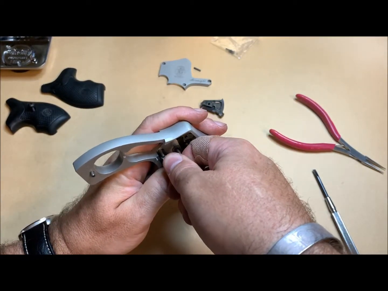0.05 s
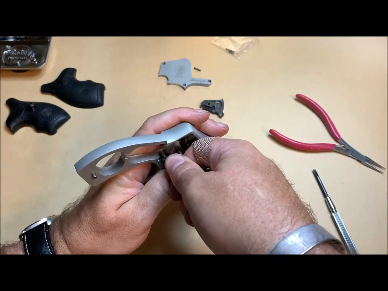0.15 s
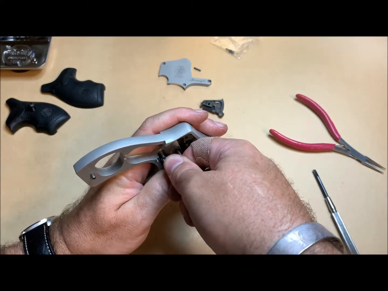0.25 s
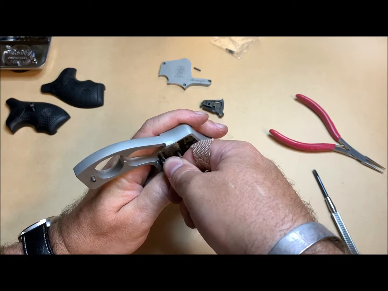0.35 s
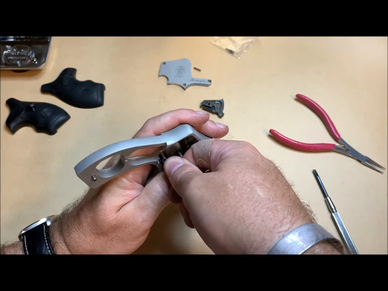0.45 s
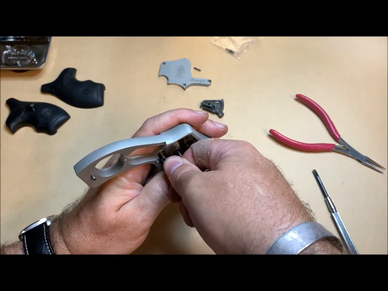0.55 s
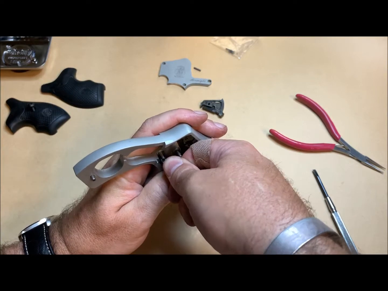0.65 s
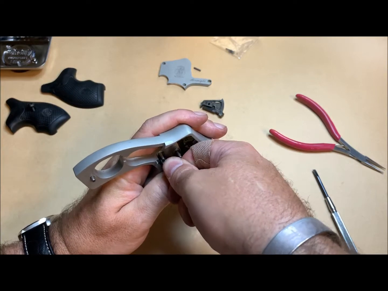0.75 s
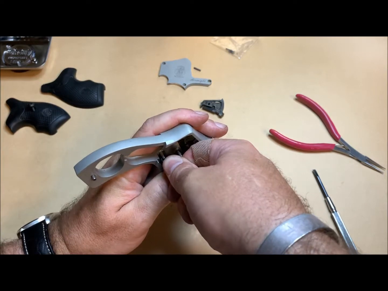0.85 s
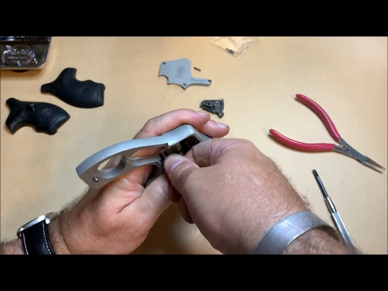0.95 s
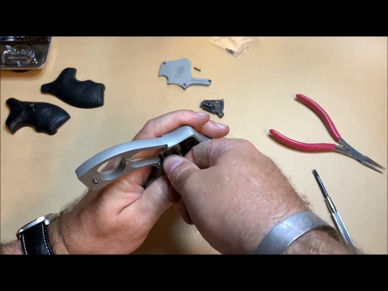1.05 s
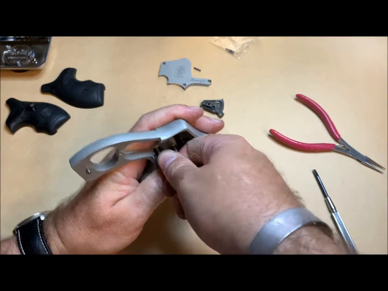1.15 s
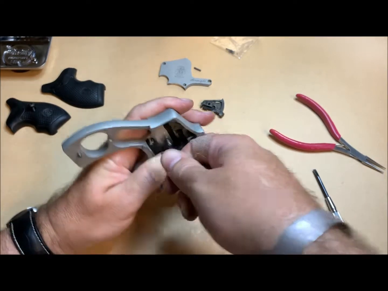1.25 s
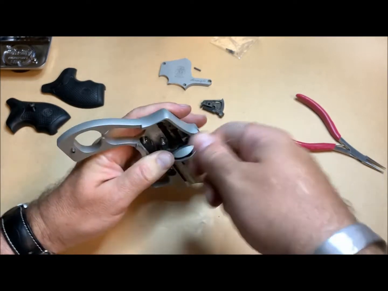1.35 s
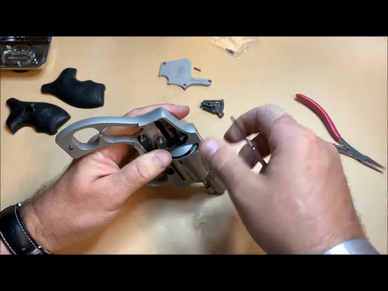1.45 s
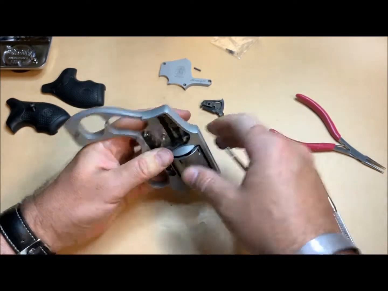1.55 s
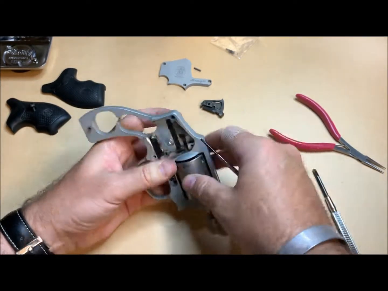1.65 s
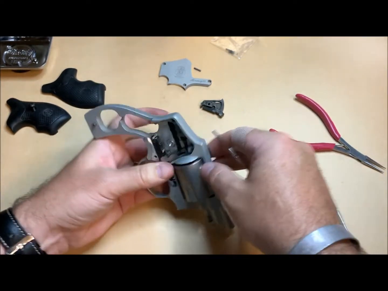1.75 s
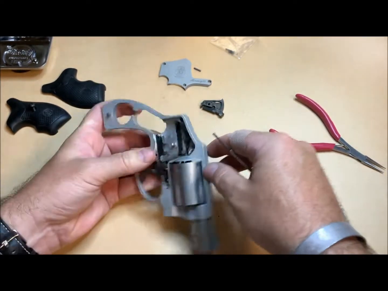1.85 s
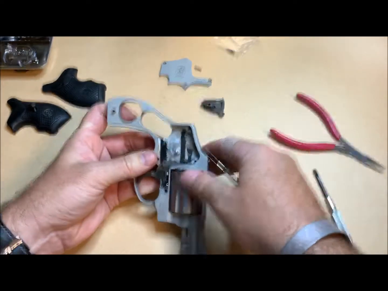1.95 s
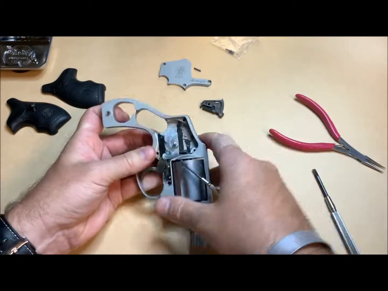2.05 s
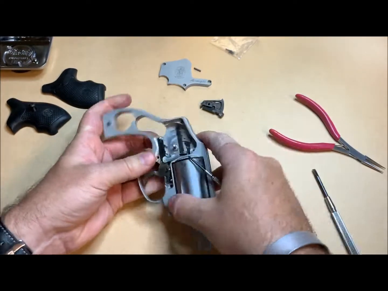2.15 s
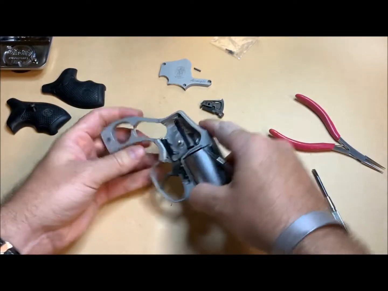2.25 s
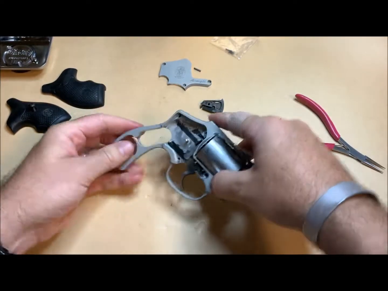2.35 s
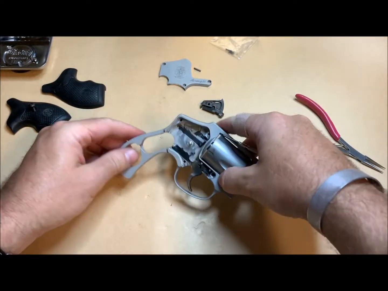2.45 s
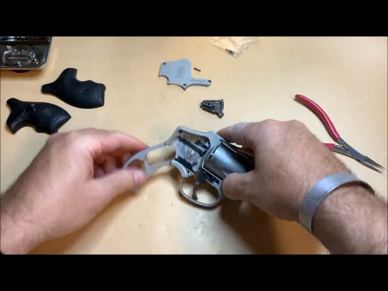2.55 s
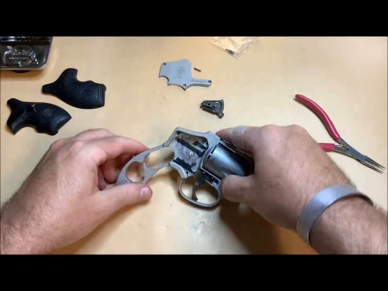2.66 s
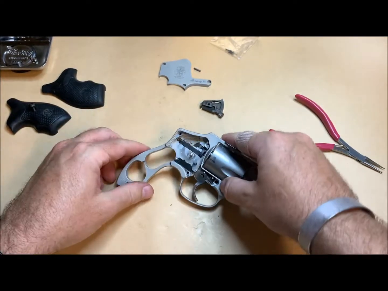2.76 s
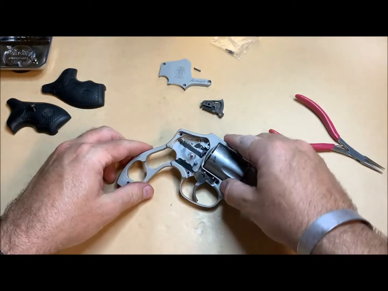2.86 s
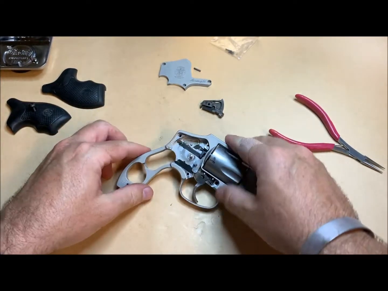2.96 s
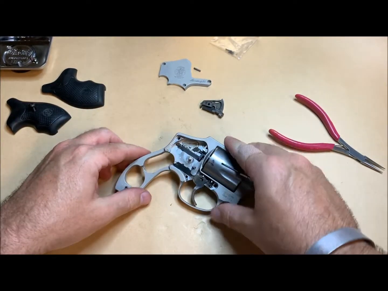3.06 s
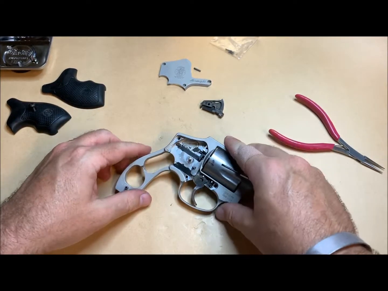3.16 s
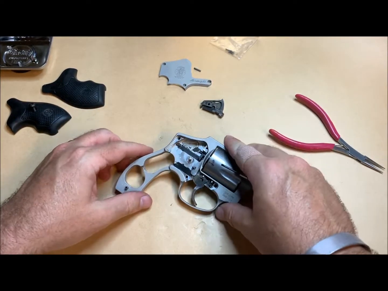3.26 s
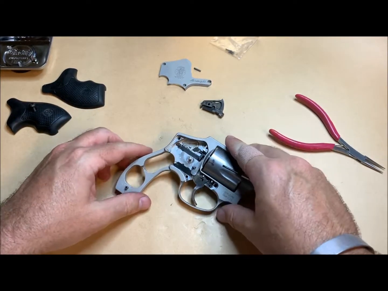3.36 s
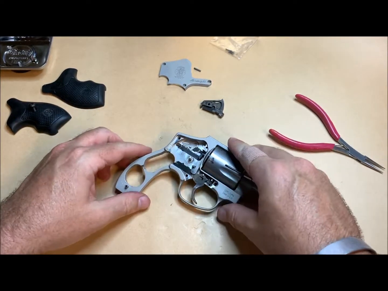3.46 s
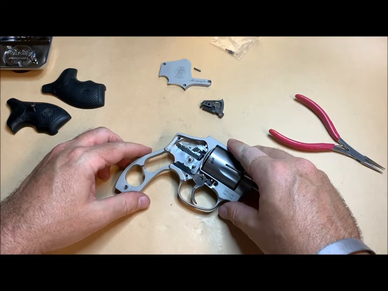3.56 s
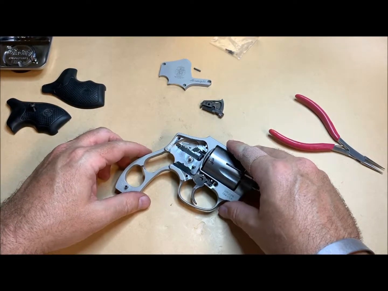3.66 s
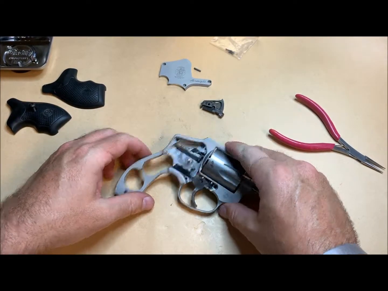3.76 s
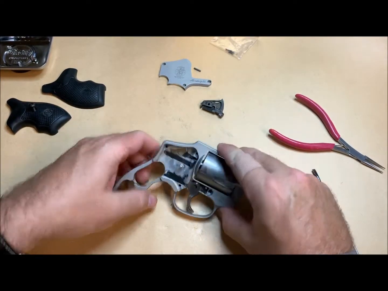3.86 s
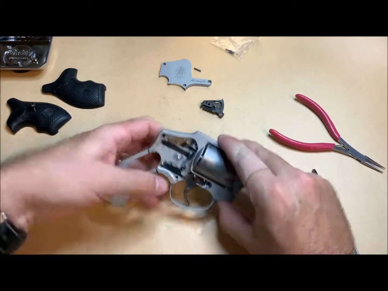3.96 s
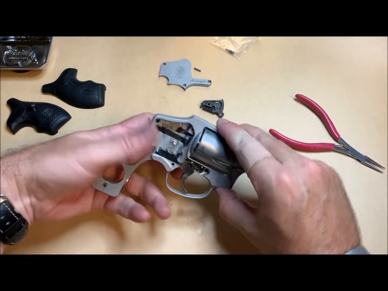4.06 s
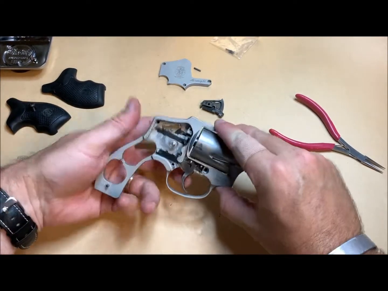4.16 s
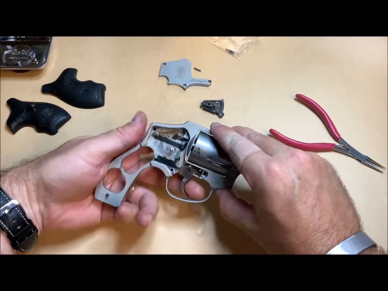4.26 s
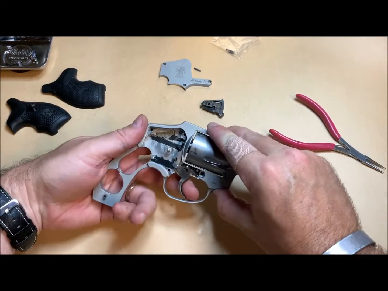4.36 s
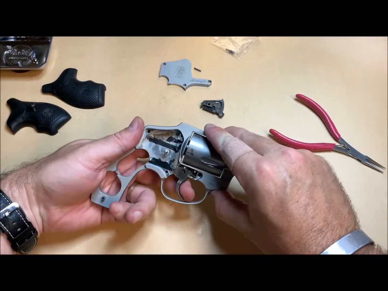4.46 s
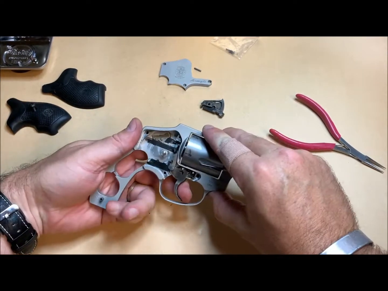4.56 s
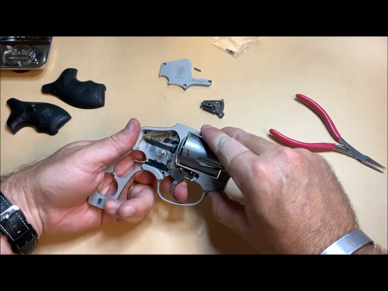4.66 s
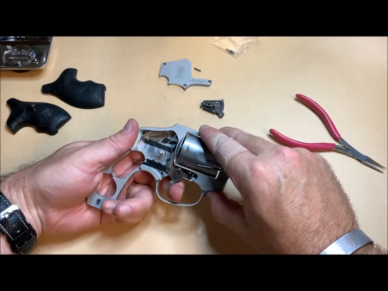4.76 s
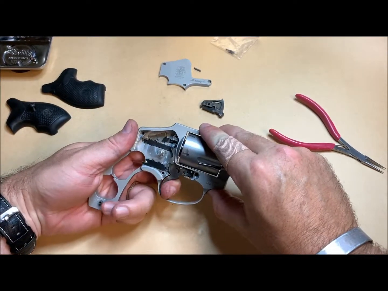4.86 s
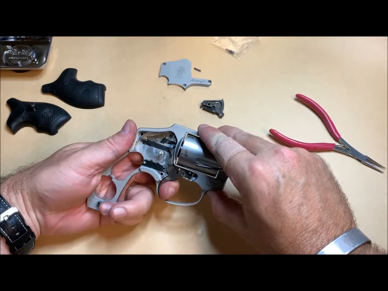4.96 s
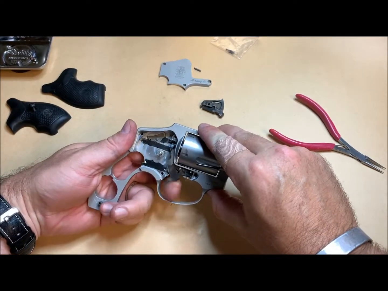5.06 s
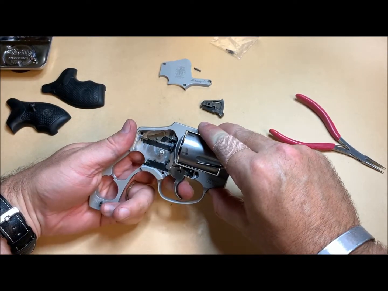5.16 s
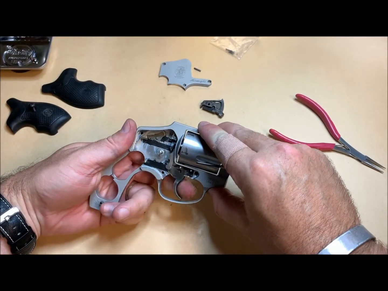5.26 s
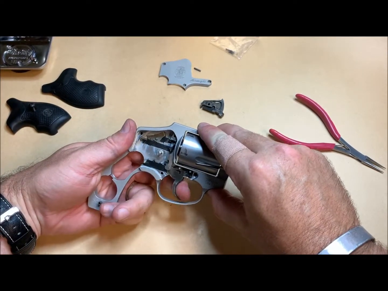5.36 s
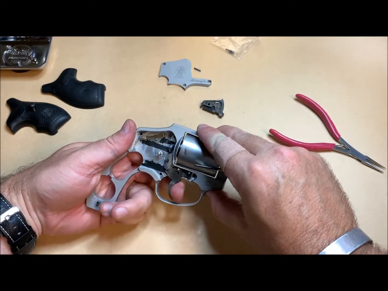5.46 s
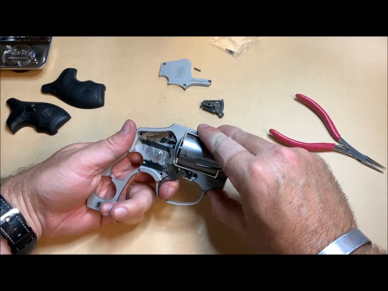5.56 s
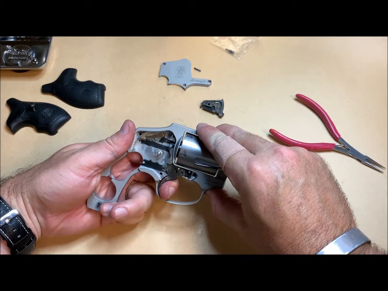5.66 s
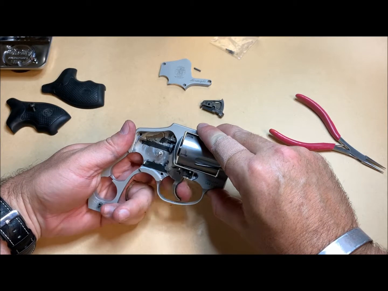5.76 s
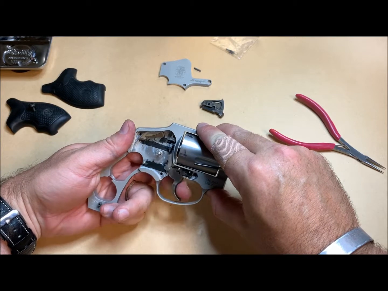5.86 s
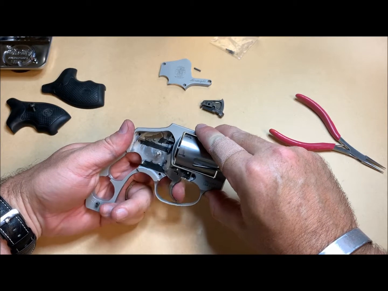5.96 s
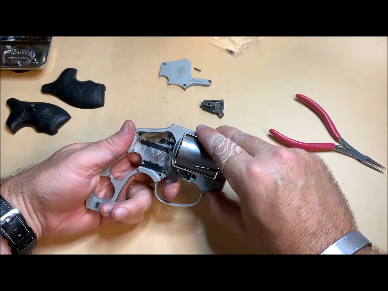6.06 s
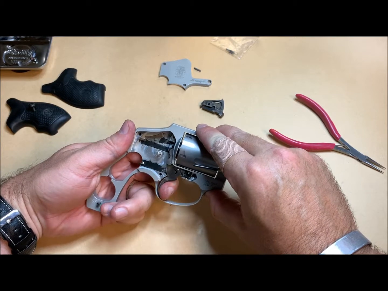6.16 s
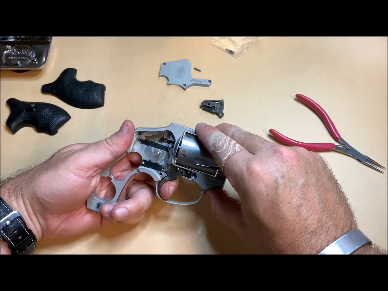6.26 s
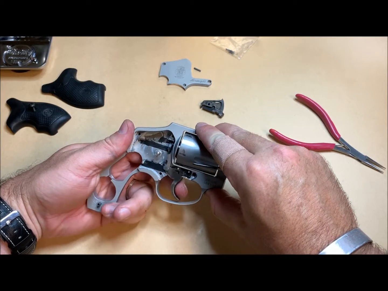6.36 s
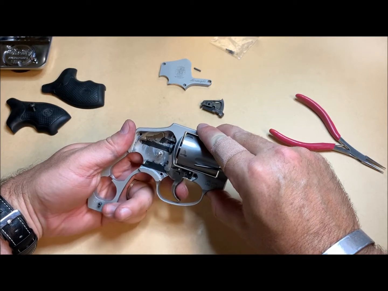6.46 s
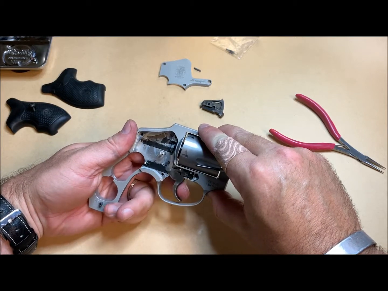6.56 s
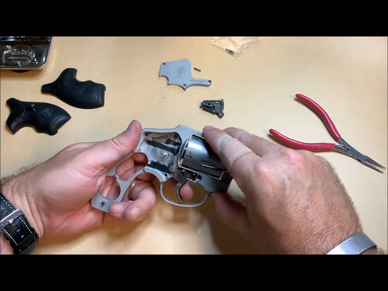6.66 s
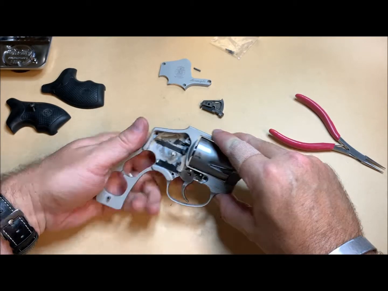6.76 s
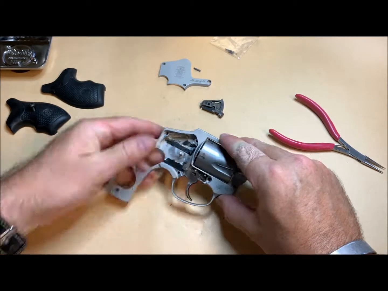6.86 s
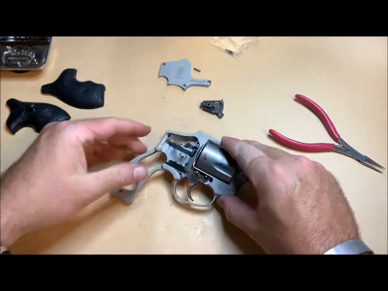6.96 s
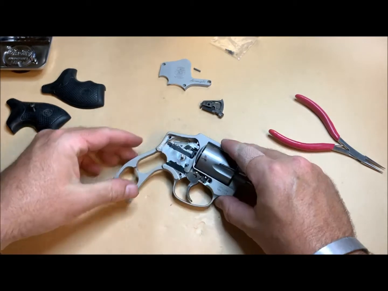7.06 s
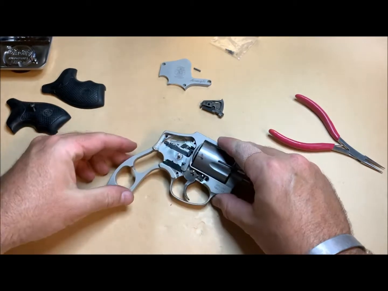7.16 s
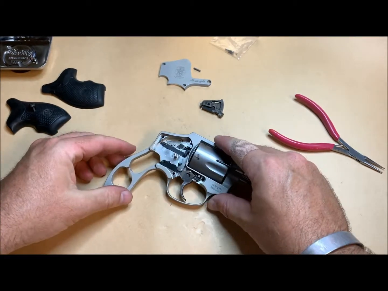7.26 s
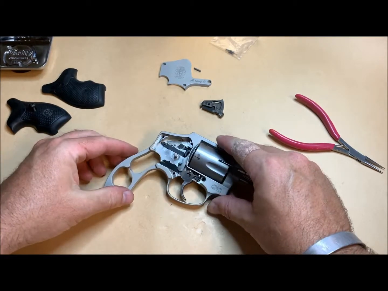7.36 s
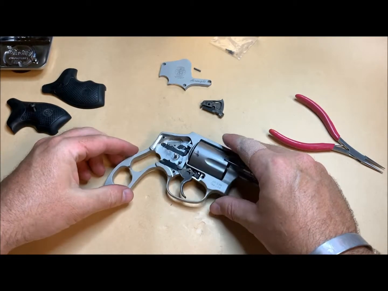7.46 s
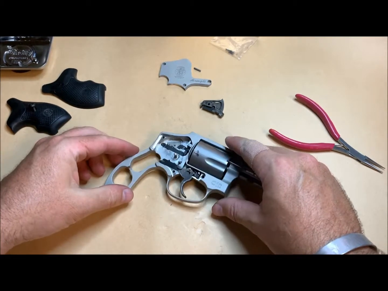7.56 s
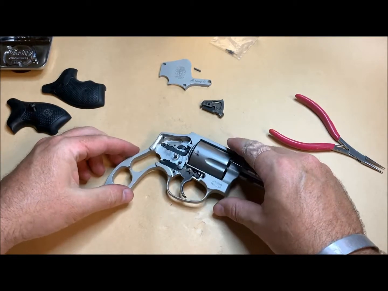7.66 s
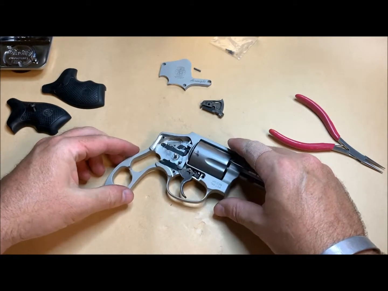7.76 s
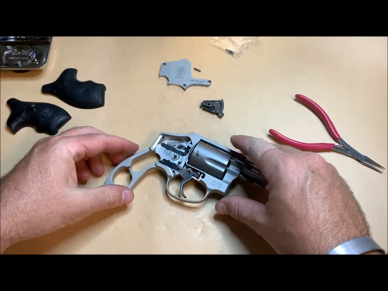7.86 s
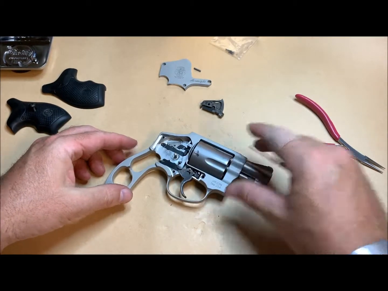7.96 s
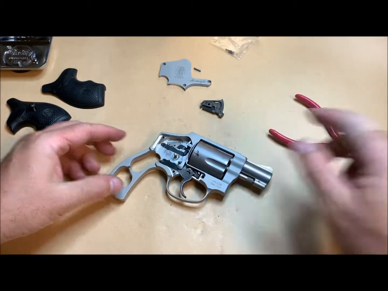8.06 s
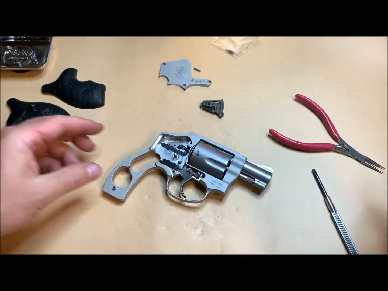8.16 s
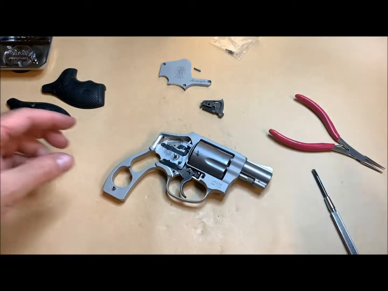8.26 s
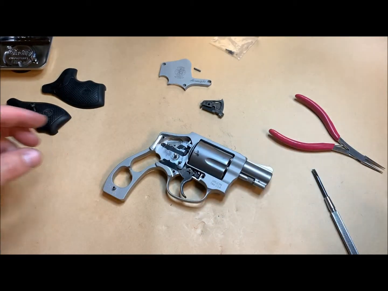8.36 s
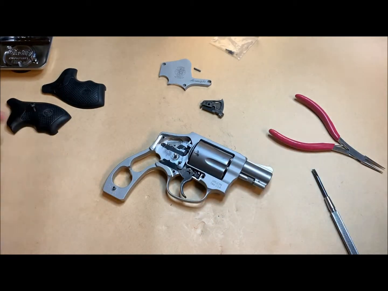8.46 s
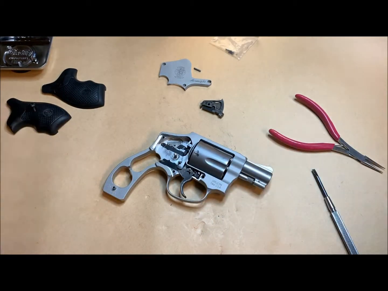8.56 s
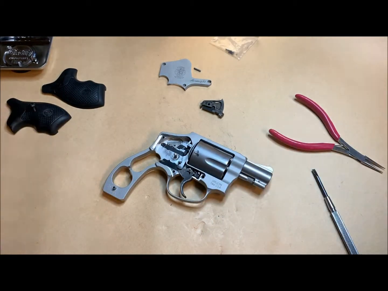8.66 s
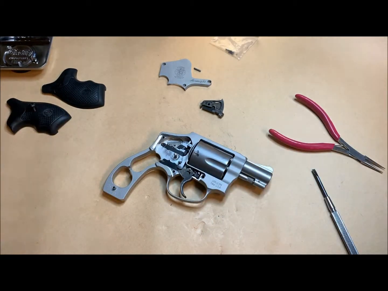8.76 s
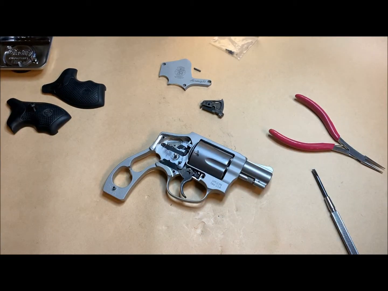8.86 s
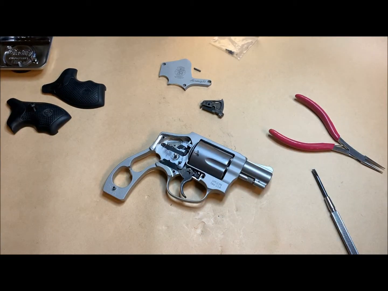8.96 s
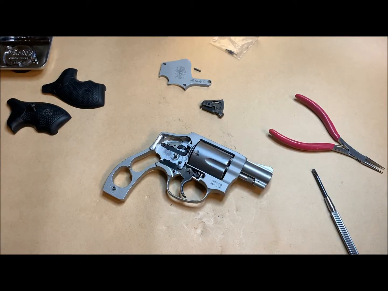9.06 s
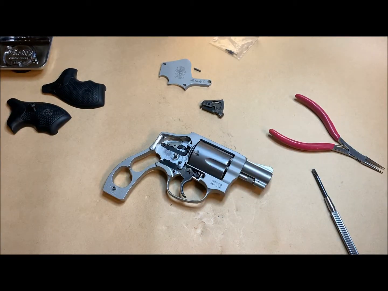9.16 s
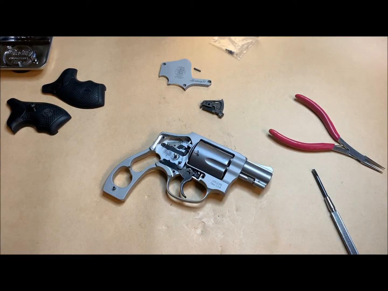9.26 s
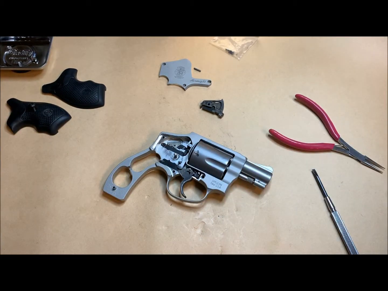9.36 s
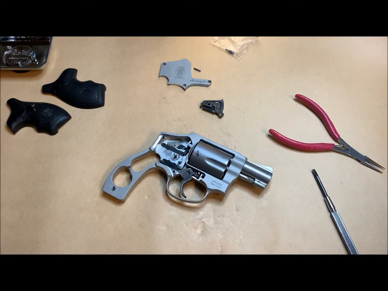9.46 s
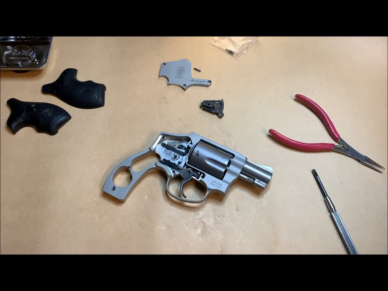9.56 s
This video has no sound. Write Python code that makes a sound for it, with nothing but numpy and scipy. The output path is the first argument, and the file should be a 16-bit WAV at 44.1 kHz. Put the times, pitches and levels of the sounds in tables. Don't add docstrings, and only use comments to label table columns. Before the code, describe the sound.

Sharp steel snap, soft wooden thump, then three crisp trigger pulls with answering reset clicks, ending in small ticks and taps in a quiet room.

```python
import sys
import numpy as np
from scipy import signal
from scipy.fft import rfft, irfft
from scipy.io import wavfile
from scipy.ndimage import uniform_filter1d

SR = 44100
rng = np.random.default_rng(int(sys.argv[2]) if len(sys.argv) > 2 else 0)


def elevation(decibels):
    levels = np.asarray(decibels, float)
    return 10 ** (levels / 20)


def output_pcm(signal):
    pcm = np.clip(np.atleast_2d(signal).T, -1, 1) * 32767
    wavfile.write(sys.argv[1], SR, np.round(pcm).astype(np.int16))


N = 423360
HOME_S = 1.03

# (stop locks [s], travel ends [s], force [dB], frame left free by the hand [dB])
PULLS = [
    (4.9144, 4.9312, -1.6, 1.6),
    (5.6257, 5.6465, 0.3, .3),
    (6.188, 6.2121, 1.2, -2.5),
]
# (pawl skips [s], sear skips [s], trigger resets [s], speed [dB], frame left free [dB])
LET_GOS = [
    (5.203, 5.2108, 5.2226, .3, -2.5),
    (5.8423, 5.8471, 5.8575, 0.6, 3.5),
    (6.4424, 6.4488, 6.4654, -0.6, 1.2),
]


def evened(x):
    return x / np.sqrt(np.mean(x ** 2) + 1e-20)


def read(points, hz):
    f, value = np.transpose(points)
    return np.interp(np.log(hz + 1), np.log(f + 1), value)


def add(mix, s, sound):
    part = mix[round(s * SR):][:len(sound)]
    part += sound[:len(part)]


def coloured(x, points):
    hz = np.fft.rfftfreq(len(x), 1 / SR)
    return irfft(rfft(x) * elevation(read(points, hz)), len(x))


def ring(modes, seconds, detune=1):
    t = np.arange(int(seconds * SR)) / SR
    detunes = detune * np.ones(len(modes))
    return sum(elevation(db - 60 * t / t60) * np.sin(2 * np.pi * hz * d * t)
               for (hz, db, t60), d in zip(modes, detunes))


def clicks(rows, modes):
    out, t = np.zeros((2, N)), np.arange(2048) / SR
    lead = 256
    heights = [(hz, db + 20 * np.log10(2 * np.log(1000) / (t60 * SR)), t60) for hz, db, t60 in modes]
    for s, peak_db, frame_db, lever_db, knock_db, chatter_ms in rows:
        sizes = rng.standard_normal(len(t)) * (3 + rng.exponential(1, len(t)))
        grip = 1 + 0.016 * rng.standard_normal(len(modes))
        u = t * 1000 / max(chatter_ms, .2)
        chatter = sizes * np.minimum(t / 0.0008, 1) * (np.exp(-u ** 2) + .35 * np.exp(-u / 1.6))
        spectrum = rfft(chatter)
        chatter = irfft(spectrum / np.sqrt(uniform_filter1d(abs(spectrum) ** 2, size=61)))[:-256]
        body = ring(heights, 2048 / SR, grip)
        body[0] += 1
        colour = [(250, knock_db - 18), (550, knock_db + 8), (1150, knock_db + 11),
                  (1800, lever_db + 6), (3000, lever_db + 14.5),
                  (4000, frame_db + 6.5), (6200, frame_db + 9), (7500, -3.8), (11000, -1), (15000, 1.1)]
        blow = coloured(np.pad(body, (lead, lead)), colour)
        sound = signal.fftconvolve(chatter, blow)
        treble = coloured(sound[1:], [(6500, -40), (7000, 0)])
        gain = elevation(peak_db - 7) / np.sqrt(uniform_filter1d(treble ** 2, 88).max())
        add(out[0], s - lead / SR, gain * sound)
        add(out[1], s - lead / SR, gain * np.linalg.norm(chatter) * blow)
    return out


def lockwork():
    # (frequency [Hz], resonance over the chatter [dB], t60 [s])
    snap_ring = [(4000, 0.5, 0.01), (5850, 6, .015), (8900, -8, .04), (12500, 2, 0.037), (14800, 1.5, .006)]
    pull_ring = [(687, 2.8, 0.045), (988, 3.4, 0.013), (1680, 3.4, 0.071), (2240, 4, 0.01),
                 (4630, 4.9, .04), (5530, 0.5, 0.025), (8000, 4, .06), (10660, 3.8, 0.037),
                 (12900, 3, 0.011), (14860, 2.8, 0.022)]
    let_go_ring = [(975, 3.1, 0.01), (2620, 5, 0.043), (4456, 6, 0.044), (5520, 5.6, 0.017),
                   (8070, 6, 0.05), (10240, 2.3, 0.029), (11540, 2.3, 0.015), (13800, 2.5, 0.016)]
    # (peak above 7 kHz [dB], frame 3.5-7 kHz [dB], lever 1.5-3.5 kHz [dB],
    # knock 0.5-1.3 kHz [dB], chatter [ms]); the bands are relative to the peak
    strut_slip = (-31, -6, -20, -28, 4.7)
    strut_home = (-1.2, -12, -28, -28, 5.3)
    creak = (-52, -11, -28, -27, 3)
    stop_free = (-37, -24, -45, -36, 3.2)
    stop_lock = (-20.5, -20, -35, -37, 3.4)
    pull_end = (-10, -13, -26.5, -19, 4.2)
    pawl_skip = (-36, -26, -37, -31, 3.9)
    sear_skip = (-29.5, -21, -38, -37, 3.5)
    reset = (-9, -17, -32, -34, 4.6)
    # (time [s], force [dB])
    slips = [
        (1.0253, -9),
        (1.2935, -1.5),
    ]
    frees = [
        4.8682,
        5.5815,
    ]
    # (time [s], force [dB])
    creaks = [
        (5.537, 1),
        (5.5574, -15),
        (5.5684, -6),
        (6.0921, 2.5),
        (6.131, -7),
    ]

    def hit(s, kind, force_db=0, free_db=0):
        peak_db, *bands_db, chatter_ms = kind
        return (s, peak_db + force_db, *np.add(bands_db, free_db), chatter_ms)

    snap = [hit(s, strut_slip, db) for s, db in slips] + [hit(HOME_S, strut_home)]
    pull = [hit(s, creak, db) for s, db in creaks] + [hit(s, stop_free) for s in frees]
    for *times, db, free in PULLS:
        pull += [hit(s, kind, db, free) for s, kind in zip(times, (stop_lock, pull_end))]
    let_go = []
    for *times, db, free in LET_GOS:
        let_go += [hit(s, kind, db, free) for s, kind in zip(times, (pawl_skip, sear_skip, reset))]
    return clicks(sorted(snap), snap_ring) + clicks(sorted(pull), pull_ring) + clicks(let_go, let_go_ring)


def pings():
    # (time [s], peak [dB], frequency [Hz], t60 [s])
    tones = [(6.189, -11, 15020, .01), (6.190, -28, 15050, .06), (6.190, -33, 15330, .05),
             (1.295, -57, 8950, .14), (1.55, -46, 14800, .015), (1.294, -40, 14400, .02),
             (9.301, -36, 12700, .015), (1.967, -63, 2100, .06), (4.933, -46, 1640, .07),
             (5.225, -46, 2680, .025), (5.86, -44, 2620, .025), (6.468, -43, 2620, .025),
             (7.057, -60, 2150, .05), (8.3115, -31, 1450, .006), (8.513, -52, 10900, .02),
             (8.518, -52, 10900, .03), (8.539, -56, 10900, .035), (9.301, -45, 3250, .02),
             (9.303, -58, 3270, .07)]
    out, t = np.zeros(N), np.arange(SR // 4) / SR
    rise = np.minimum(t / .0008, 1)
    for s, peak_db, hz, t60 in tones:
        add(out, s, rise * ring([(hz, peak_db, t60)], len(t) / SR)[:len(t)])
    return out


def low_bump():
    bump_db, rise_s, fall_s, settle_hz = -22.5, .004, .006, 1.1
    out, t = np.zeros(N), np.arange(SR // 4) / SR
    add(out, HOME_S, elevation(bump_db) * np.minimum(t / rise_s, 1) * np.exp(-t / fall_s))
    return signal.lfilter(*signal.butter(1, settle_hz, "high", fs=SR), out)


def bench():
    # (time [s], peak [dB], wood rattle [dB])
    thumps = [
        (1.029, -38, -8.5),
        (2.063, -28, -16),
        (2.668, -43.5, -8.5),
        (2.688, -39, -19),
        (4.288, -48.5, -28),
        (7.050, -36, -20),
        (7.186, -50, -10.5),
        (7.600, -48, -15.5),
        (8.31, -57, -2.5),
        (9.300, -51, -2),
    ]
    # (frequency [Hz], level [dB], t60 [s])
    board_low = [(57.27, 1.5, 0.3), (77.17, 3, .2)]
    board_high = [(112, 5, 0.19), (138, -5, .15), (233, -11, 0.19), (360, -19, 0.19), (450, -29, .2),
                  (660, -22.5, .1)]
    # (frequency [Hz], level [dB])
    wood = [(120, -20), (220, 1), (450, -4), (900, -13.5), (2000, -19.5), (4000, -40)]
    contact_ms, high_db, cut_hz = 5, -4, 64
    jolt_db, jolt_wood_db = -57, -23
    out, t = np.zeros(N), np.arange(int(.3 * SR)) / SR
    low, high = ring(board_low, .3), ring(board_high, .3)
    push = np.hanning(max(int(contact_ms * SR / 1000), 8))
    thump = signal.fftconvolve(low + elevation(high_db + 9) * high, push)[:len(t)]
    thump = signal.sosfilt(signal.butter(3, cut_hz, "high", fs=SR, output="sos"), thump)
    thump = thump / abs(thump).max()
    fade = signal.windows.tukey(2 * len(t), .3)[len(t):]
    rattle_shape = np.minimum(t / .002, 1) * elevation(-60 * t / .16)
    jolts = [(row[-3], jolt_db, jolt_wood_db) for row in PULLS + LET_GOS]
    for s, peak_db, wood_db in thumps + jolts:
        rattle = evened(coloured(rng.standard_normal(len(t)), wood)) * rattle_shape
        add(out, s, elevation(peak_db) * fade * (thump + elevation(wood_db) * rattle))
    return out


def ticks():
    bright_ticks = [(1.5494, -50, -23, -36), (1.8876, -47, -18, -27), (1.8924, -44, 0.1, -21),
                    (4.1194, -67, -12.5, -17.5), (8.3634, -52, -22.5, -28.5), (8.4377, -50, -26, -40),
                    (8.4901, -53, -23, -29), (8.5133, -50, -40, -42), (8.538, -53, -33, -29)]
    dull_ticks = [(2.0653, -38.5, -14, -11), (2.3044, -57, -10, -7), (2.404, -62.5, -14, -3),
                  (2.6646, -45.5, -9.5, -14.5), (2.6896, -61.5, -7, 3), (2.759, -62, -12, -7),
                  (3.879, -56, -11, -4), (7.1925, -42, -15, -11), (8.1594, -68, -13, -6)]
    dry_ticks = [(0.7194, -68, -8, 2.1), (1.9657, -52, -5.5, -9), (2.233, -54, -7, -7),
                 (7.051, -54, -10, -3), (7.0559, -52, -12, -6), (8.3111, -37, -10, -.6),
                 (8.8922, -54, -14, -.6), (9.3005, -35, -7, -3)]
    # (frequency [Hz], resonance over the chatter [dB], t60 [s])
    tick_ring = [(1445, 1.5, .012), (2170, 2.9, 0.02), (5020, 2.1, 0.006), (10960, 2.3, 0.019),
                 (14150, 1.3, .012)]
    chatter_ms = 3
    kinds = (bright_ticks, 5), (dull_ticks, 7), (dry_ticks, -9)
    rows = [(*row, row[-1] + knock_db, chatter_ms) for kind, knock_db in kinds for row in kind]
    return clicks(sorted(rows), tick_ring)


def slides():
    # (start [s], length [s], level [dB], drift over the stroke [dB])
    strokes = [
        (3.005, .18, -81.5, -1.5),
        (3.865, .2, -71, 1.5),
        (6.86, .05, -72, 1.5),
        (6.89, .17, -65, -6),
    ]
    # (frequency [Hz], level per Hz [dB])
    skin = [(590, -43), (1000, -4.5), (2150, -6.5), (2740, -14), (3300, -3.5), (6700, -9.5), (13600, 1),
            (16000, -15)]
    rise_s, fall_s = .03, .015
    grains = rng.standard_normal(N) * (1 + .4 * rng.exponential(1, N))
    hiss, out = evened(coloured(grains, skin)), np.zeros(N)
    for s, length, level_db, drift_db in strokes:
        t = np.arange(0, length, 1 / SR)
        swell = np.minimum(np.minimum(t / rise_s, (length - t) / fall_s), 1) ** 2
        add(out, s, hiss[round(s * SR):][:len(t)] * elevation(level_db + drift_db * t / length) * swell)
    return out


def room(x, turns_per_s=.6):
    # (frequency [Hz], t60 [s])
    decay = [(200, 0.12), (800, 0.21), (2000, 0.39), (5000, .45), (9000, 0.35), (15000, .33)]
    taps = np.zeros((3, SR))
    slots = np.arange(260, SR - 10, 10)
    at = slots + rng.integers(0, 10, (3, len(slots)))
    np.put_along_axis(taps, at, rng.choice([-1., 1.], at.shape), 1)
    hz, t, z = signal.stft(taps, SR, nperseg=256)
    early = 1 + 1.7 * np.exp(-t / .012)
    dying = elevation(-60 * t / read(decay, hz)[:, None])
    tail = signal.istft(z * early * dying, SR, nperseg=256)[1]
    phase = turns_per_s * np.arange(N) / SR + np.arange(3)[:, None] / 3
    turn = np.cos(2 * np.pi * phase) * np.sqrt(2 / 3)
    return signal.fftconvolve(x * turn, tail / np.linalg.norm(tail[0]), axes=1)[:, :N].sum(0)


def air():
    # (frequency [Hz], level [dB])
    tone = [(12, -53.5), (20, -14), (53, -4.5), (86, -9), (117, 0), (169, -15.5), (281, -9.5), (351, -15.5),
            (382, -10), (440, -13), (1320, -27), (1470, -27), (1840, -31.5), (15200, -34), (16500, -54.5)]
    air_db, hum_db, hum_hz = -66.5, -74, 116
    frames, hz = N // 512 + 5, np.fft.rfftfreq(2048, 1 / SR)
    a, b, patches = rng.standard_normal((frames, 1025, 3)).T
    patches = evened(uniform_filter1d(uniform_filter1d(patches, 20, 0), 12, 1))
    z = (a + 1j * b) * elevation(read(tone, hz)[:, None] + 0.27 * patches)
    rumble = signal.istft(z, nperseg=2048, noverlap=1536)[1][:N]
    hum = signal.lfilter(*signal.iirpeak(hum_hz, 6, SR), rng.standard_normal(N))
    return elevation(air_db) * evened(rumble) + elevation(hum_db) * evened(hum)


def scene():
    direct, spread = lockwork() + ticks() + slides() + pings()
    return (direct + elevation(-11.5) * room(spread) + bench() + low_bump() + air())[None]


def low_pass(x):
    return signal.sosfilt(signal.butter(12, 16970, fs=SR, output="sos"), x)


def record(dry):
    overload, edge_hz = .65, 15950
    squeezed = overload * np.tanh(dry / overload)
    band = signal.firwin(511, edge_hz, window=("kaiser", 4), fs=SR)
    return low_pass(signal.oaconvolve(squeezed, band[None], "same"))


dry = scene()
out = record(dry)
output_pcm(out)
```